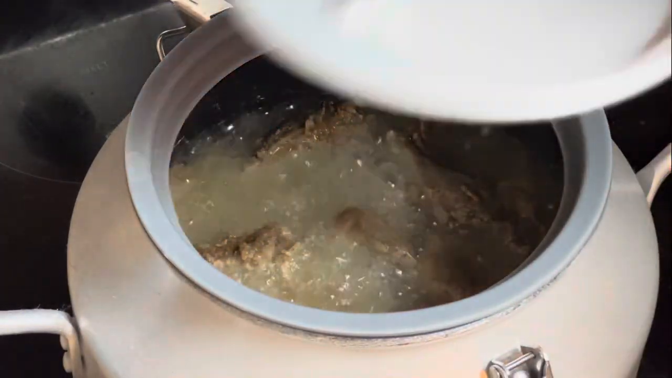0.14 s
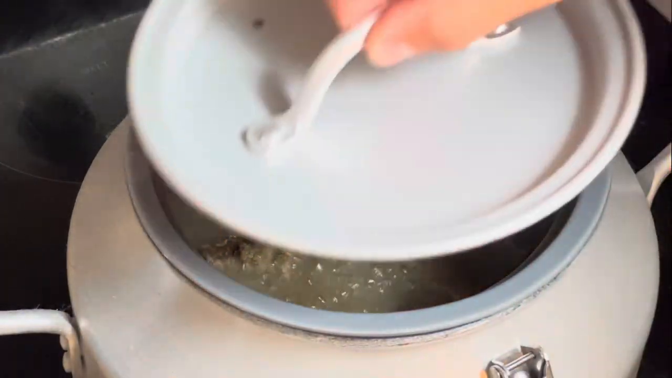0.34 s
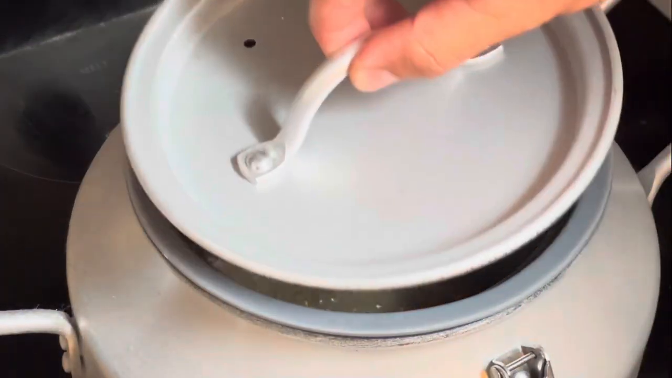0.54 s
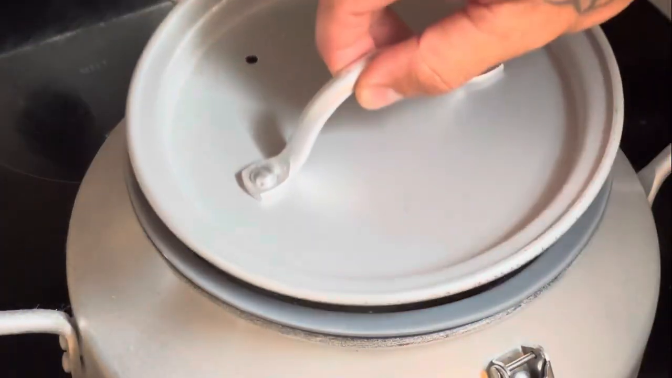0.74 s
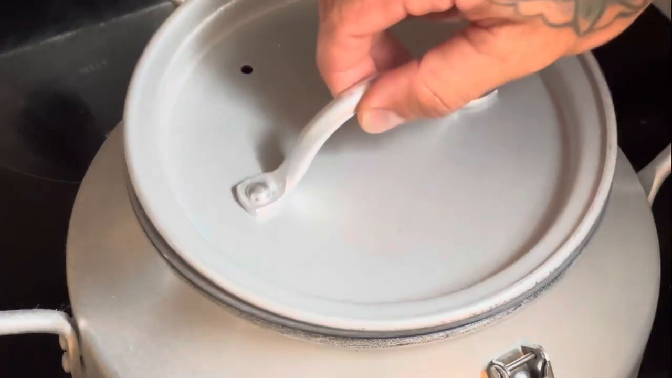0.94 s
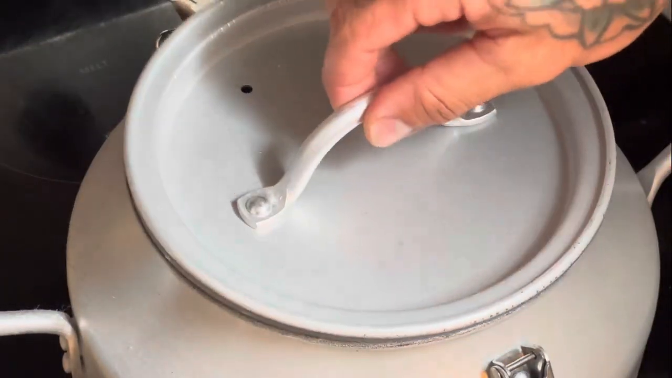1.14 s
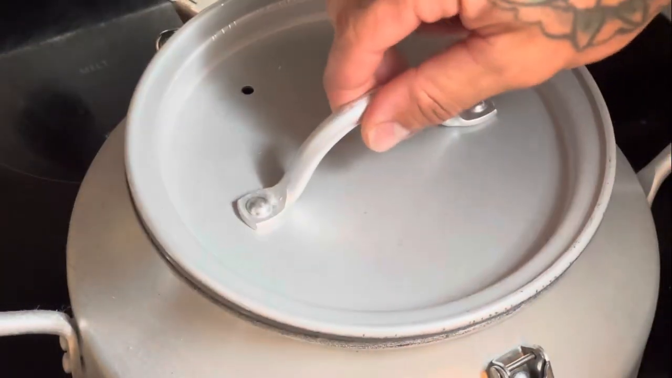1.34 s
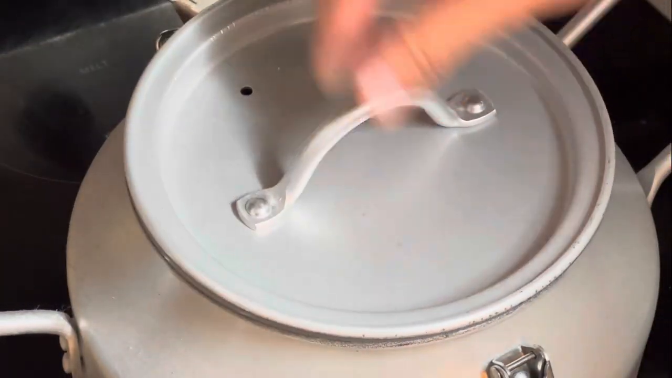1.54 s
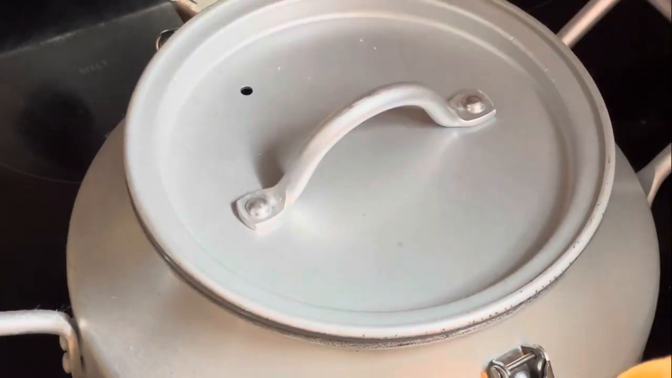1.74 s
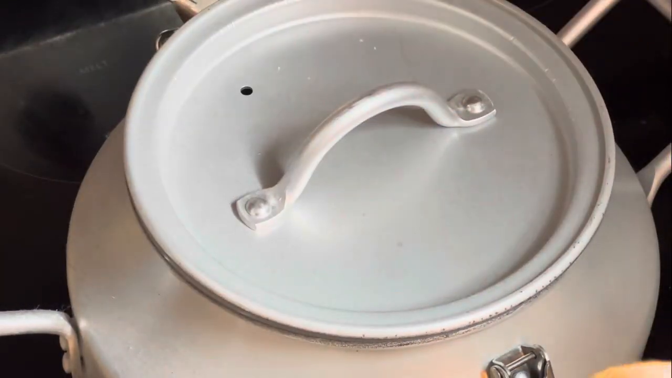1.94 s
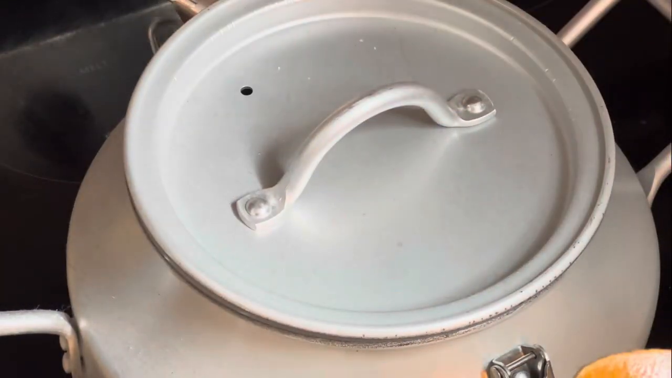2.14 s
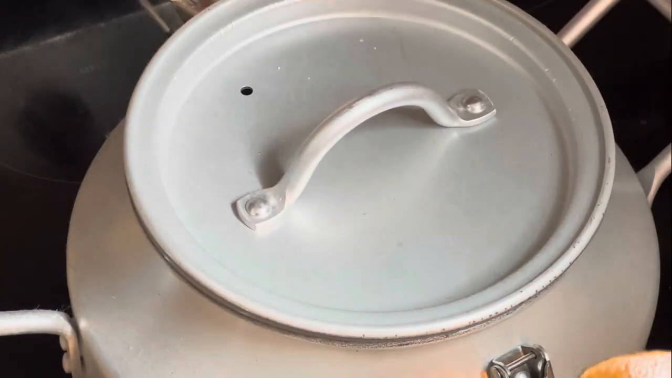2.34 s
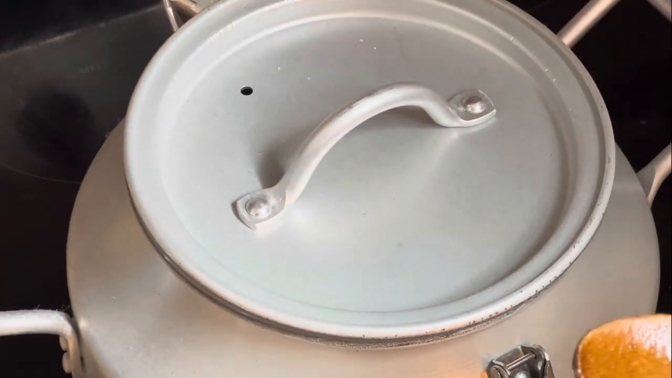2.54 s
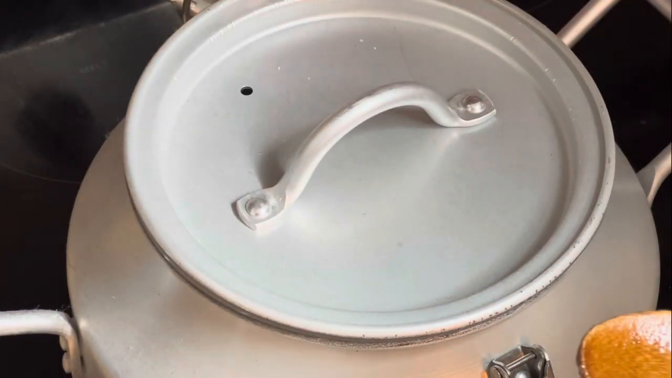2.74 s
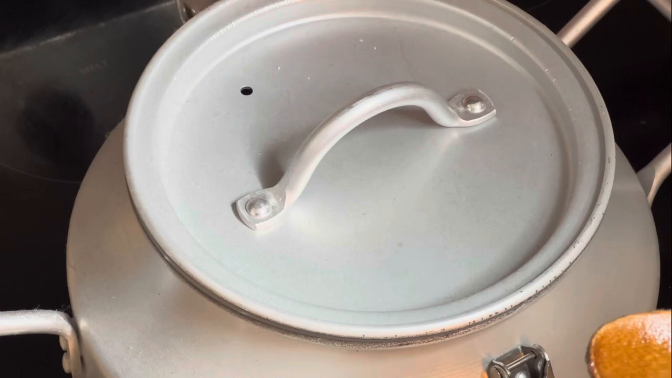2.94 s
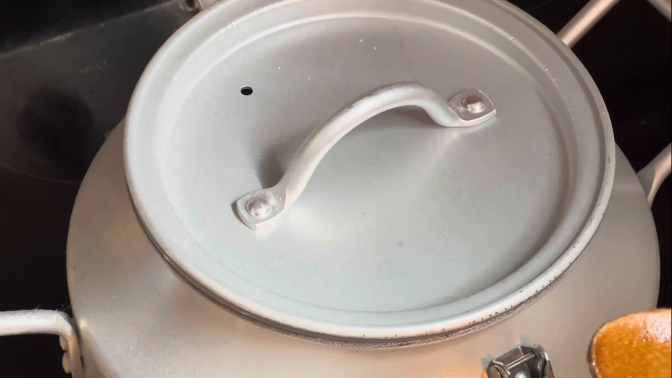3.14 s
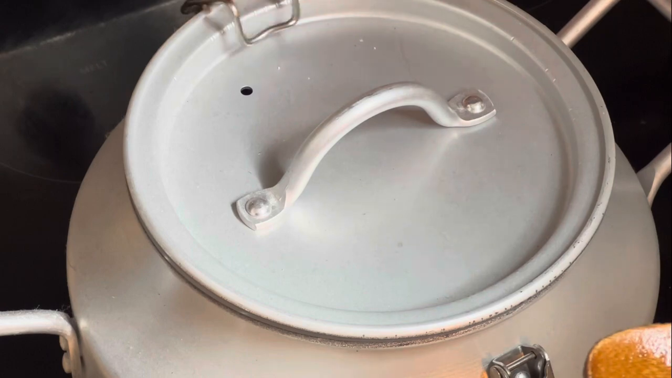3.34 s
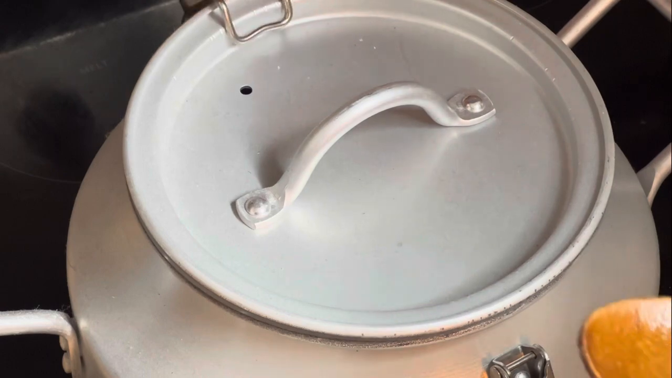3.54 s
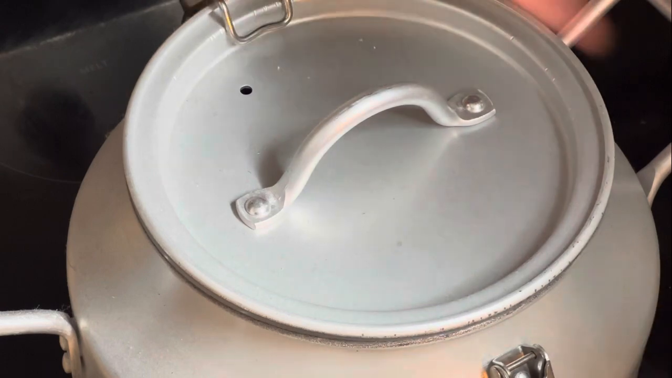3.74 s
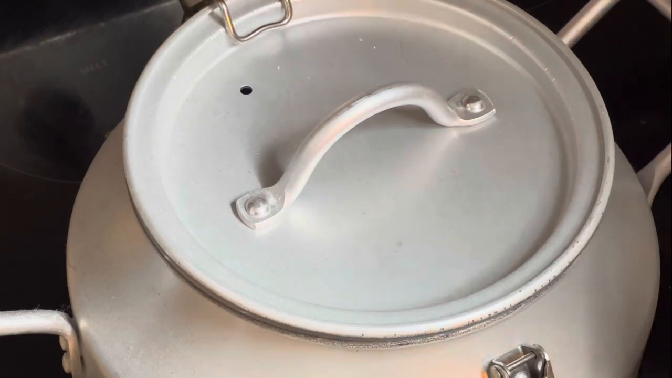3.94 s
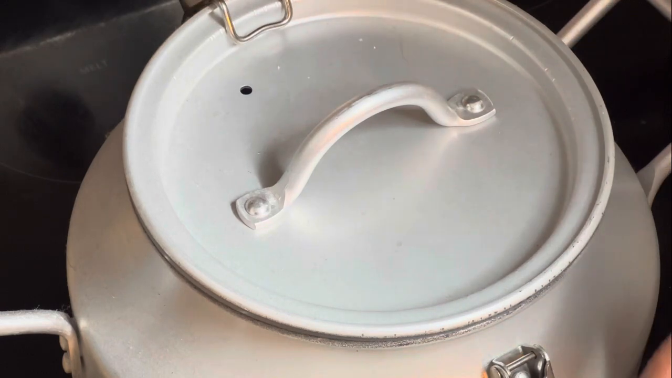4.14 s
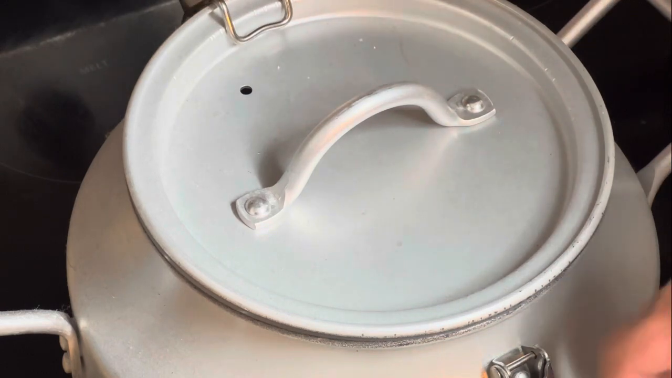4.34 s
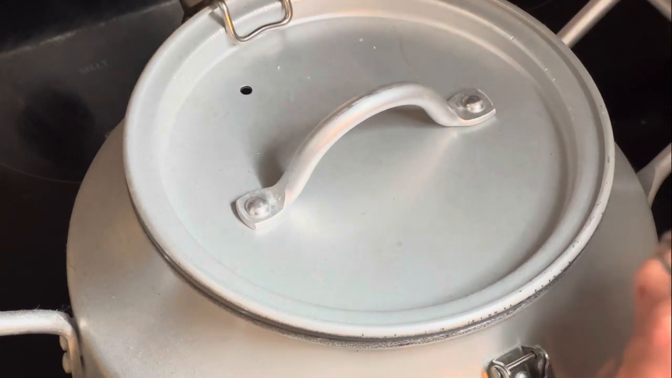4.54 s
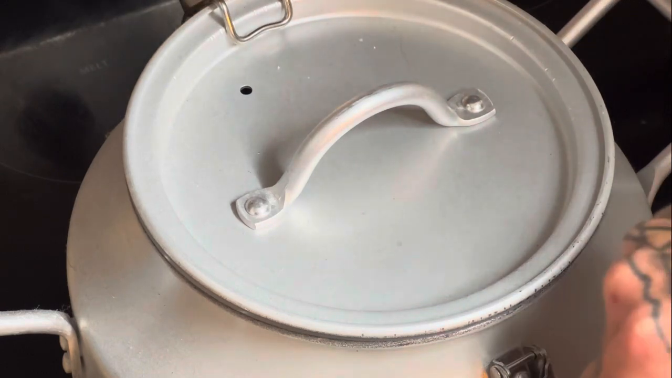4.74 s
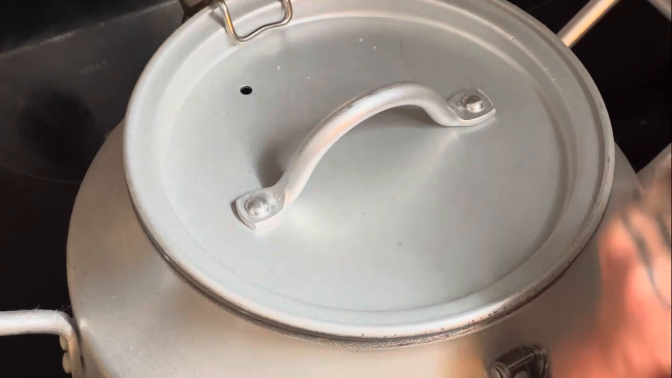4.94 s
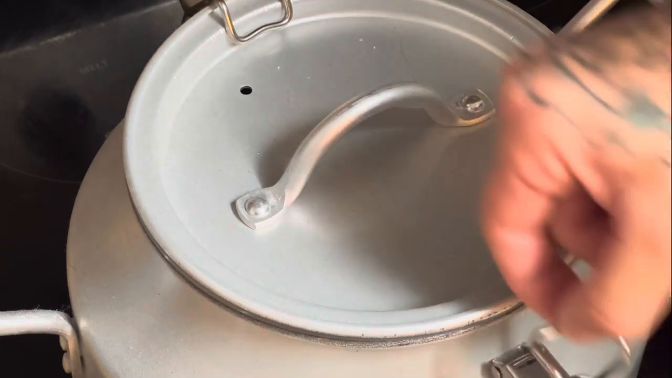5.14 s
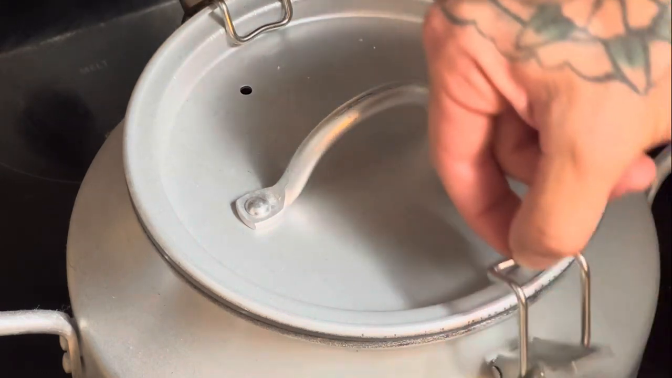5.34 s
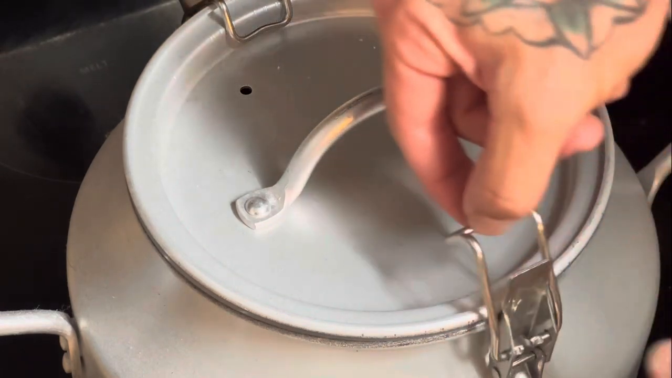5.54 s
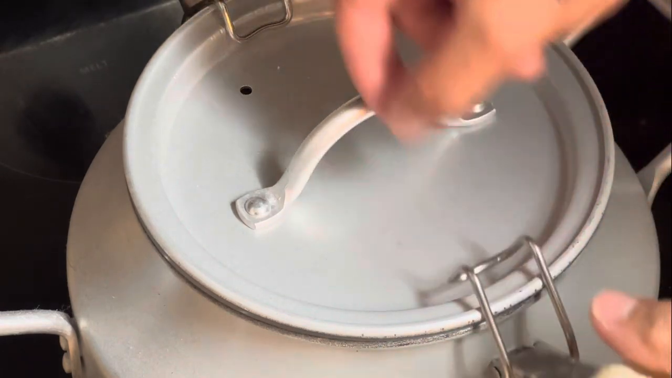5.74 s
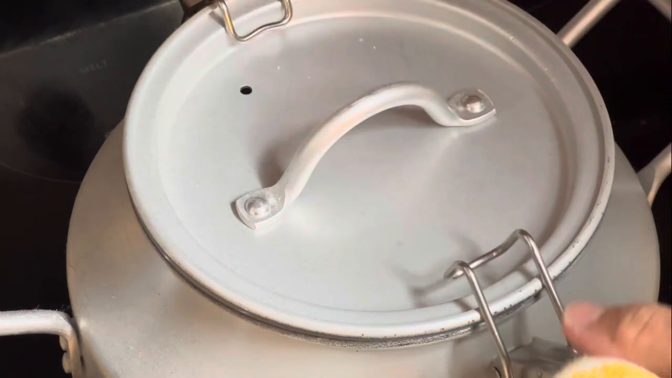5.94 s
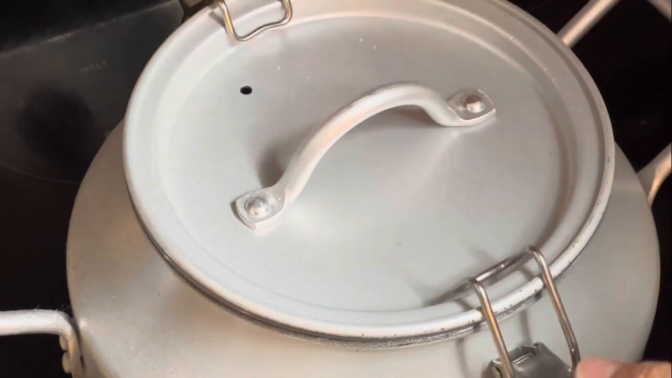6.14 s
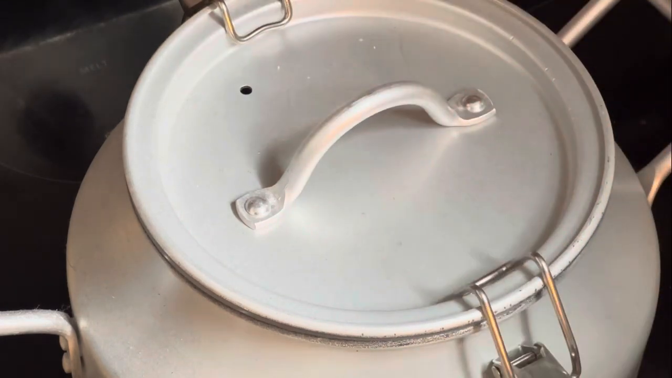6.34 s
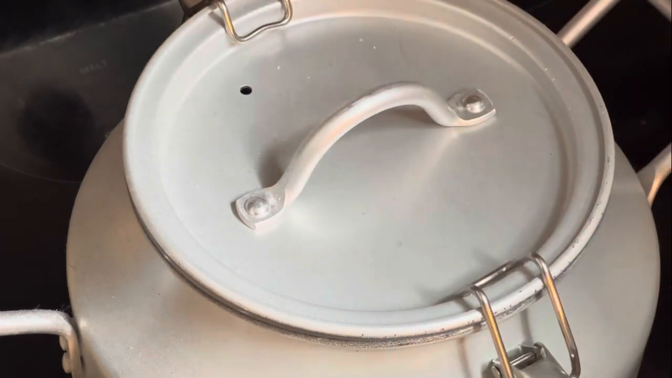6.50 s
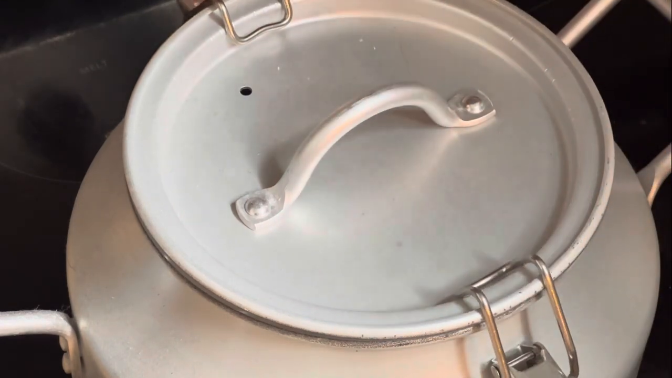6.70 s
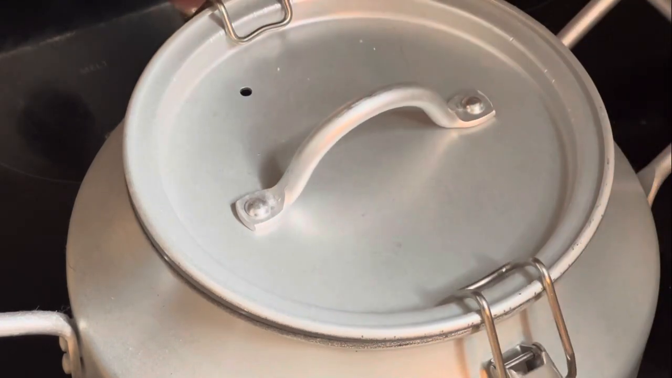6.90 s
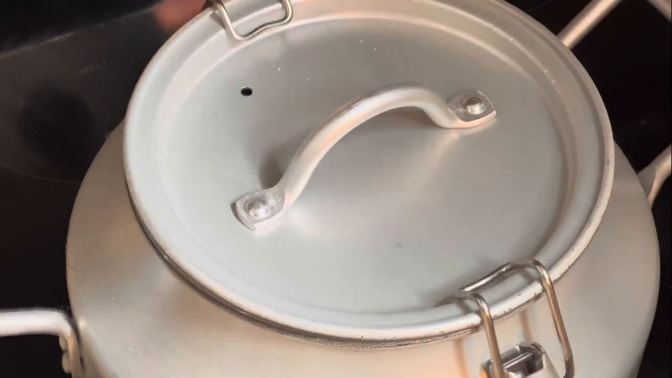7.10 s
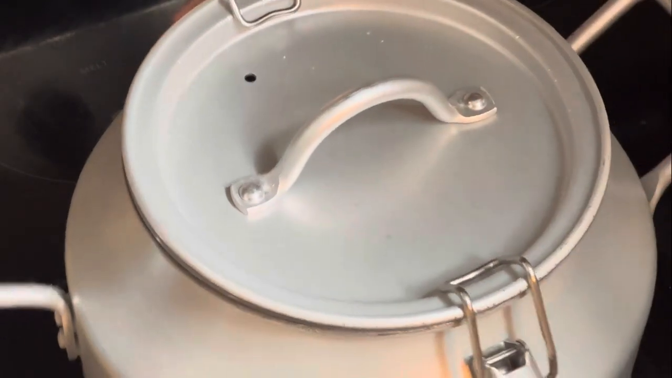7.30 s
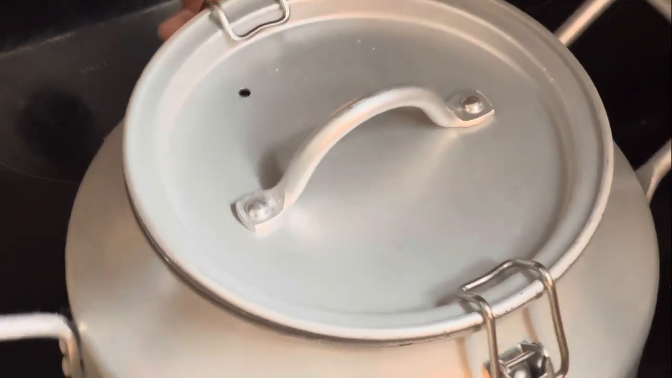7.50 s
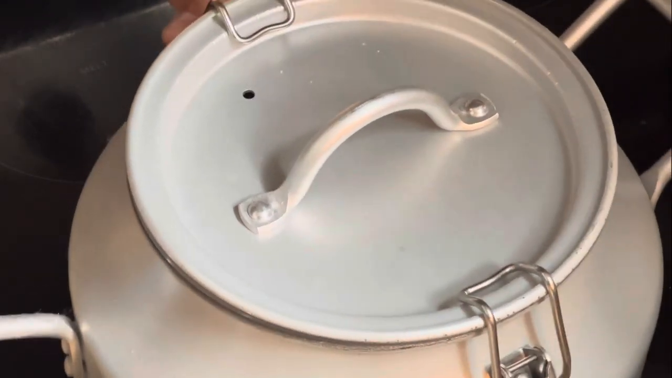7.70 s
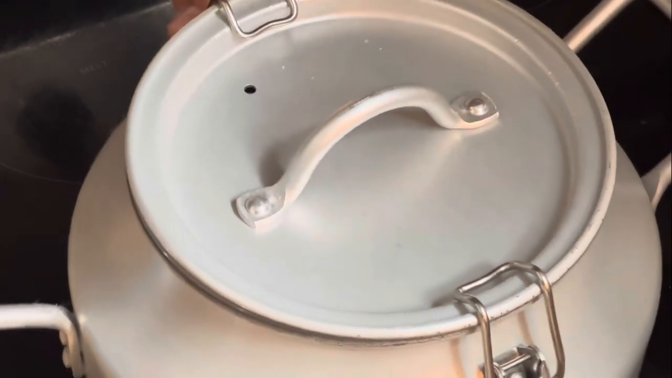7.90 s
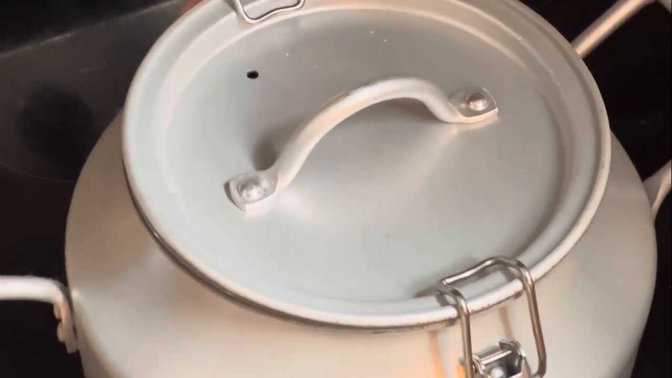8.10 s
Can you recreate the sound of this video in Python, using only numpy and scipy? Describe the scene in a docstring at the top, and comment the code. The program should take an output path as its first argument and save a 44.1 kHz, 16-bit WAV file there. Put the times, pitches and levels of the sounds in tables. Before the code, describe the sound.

Steady crackling fry from a pot, its hollow tone sinking as the lid closes, followed by sharp metallic clacks of wire clasps and latches.

```python
"""Frying meat sizzles in a deep metal pot: tiny bursts and hiss ring in many narrow pitch ranges.
A lid is lowered and muffles it, and the hollow tone of the pot's air sinks and fades.
Louder spits pop. Wire clasps flipped onto the lid and a snapping lever rattle, ring and thud.
A low rumble, a faint hum and a wandering drone lie underneath.
Two microphone ports close together hear the treble out of phase."""
import sys
import numpy as np
from scipy import signal
from scipy.fft import rfft, irfft, next_fast_len
from scipy.io import wavfile

SR = 44100
rng = np.random.default_rng(int(sys.argv[2]) if len(sys.argv) > 2 else 0)


def invert_db(level):
    """Linear amplitude ratio for a level in decibels (20 dB per decade), elementwise."""
    return 10 ** (np.asarray(level, dtype=float) / 20)


def pcm_store(signal):
    """Save signal as 16-bit PCM."""
    levels = np.round(np.clip(np.atleast_2d(signal), -1, 1) * 32767)
    wavfile.write(sys.argv[1], SR, levels.astype(np.int16).T)


N = 359856   # length in samples


def rms_one(x):
    """Scale to rms 1."""
    return x / np.sqrt(np.mean(x ** 2) + 1e-20)


def in_time(rows):
    """Turn each column of a time table into one value a sample."""
    s, *columns = np.transpose(rows)
    return [np.interp(np.arange(N) / SR, s, column) for column in columns]


def at_hz(points, hz):
    """Read a spectrum between its points, along a log-frequency axis."""
    points = np.array(points, float)
    return np.interp(np.log(hz + 1), np.log(points[:, 0] + 1), points[:, 1])


def coloured(x, spectrum):
    """Filter a sound by a spectrum, then scale to rms 1."""
    size = next_fast_len(N)
    hz = np.arange(size // 2 + 1) * SR / size
    return rms_one(irfft(rfft(x, size) * invert_db(at_hz(spectrum, hz)), size)[:N])


def drift(rate_hz):
    """Slow random wandering of spread 1, made at every 40th sample and joined by lines."""
    r = np.exp(-80 * np.pi * rate_hz / SR)
    slow = signal.lfilter([1], [1, -2 * r, r * r], rng.standard_normal(N // 40 + 2002))[2000:]
    return np.interp(np.arange(N) / 40, np.arange(len(slow)), rms_one(slow))


def ring(clicks, hz, t60_s):
    """A resonance: each unit click sets off a sine of height 1 that falls 60 dB in t60_s."""
    r, w = invert_db(-60 / (t60_s * SR)), 2 * np.pi * hz / SR
    return signal.lfilter([0, np.sin(w)], [1, -2 * r * np.cos(w), r * r], clicks + 1e-18)


def add(out, s, sound):
    """Mix a short sound in at a time in seconds."""
    i = round(s * SR)
    out[i:i + len(sound)] += sound[:len(out) - i]


def opening():
    """Share of the pot mouth left free: the lid covers it slowly at first, then faster."""
    lid_down_s, closing_bend = 1.15, 1.4
    return 1 - np.minimum(np.arange(N) / SR / lid_down_s, 1) ** closing_bend


def vigour_db():
    """How far the frying stands above its settled level: a short flare dies, then it settles."""
    flare_db, flare_s, settle_db, settle_s = 3.5, 0.064, 1.5, 1
    t = np.arange(N) / SR
    return flare_db * np.exp(-t / flare_s) + settle_db * np.exp(-t / settle_s)


def sizzle():
    """Tiny steam bursts and hiss ring in narrow pitch ranges; each swells and thins by itself."""
    # colour of the frying: pitch_hz [Hz], density_db [dB per Hz]
    sizzle_colour = [(200, -4), (600, -11.5), (1500, -5), (2300, -2.5), (3000, 1.5), (3900, 2), (4700, 0.5),
                     (6300, 3), (8200, 5), (10100, 1), (11000, -6.5), (13000, -9), (15700, -3),
                     (16300, -26)]
    shut_lid_db, open_mouth_extra_db = -50.5, 3
    sizes = invert_db(3.0 * np.minimum(rng.exponential(1, N), 4)) * rng.choice([-1, 1], N)
    born = rng.random(N) < 6000 * invert_db(3.0 * drift(40)) / SR   # bursts crowd and thin out
    pitches = np.geomspace(600, 16000, 18)
    dealt = rng.integers(0, 18, N)   # the pitch range each burst falls in
    hiss = invert_db(-18.5) * rng.standard_normal((2, N))
    out = 0
    for k, hz in enumerate(pitches):
        bursts = ring(sizes * born * (dealt == k) + hiss[k % 2], hz, 5.0 / hz)
        out = out + rms_one(bursts) * np.sqrt(hz) * invert_db(2.4 * drift(12))
    level_db = shut_lid_db + open_mouth_extra_db * opening() + vigour_db() + .5 * drift(10)
    return coloured(out, sizzle_colour) * invert_db(level_db)


def pot_air():
    """Bubbling excites the air in the pot; the narrowing mouth lowers one pitch, not the other."""
    open_mouth_hz, mouth_db = 485, -60
    crosswise_hz, crosswise_db = 1035, -4   # air swinging from side to side; level against the mouth tone
    t = np.arange(N) / SR
    hz = open_mouth_hz * np.sqrt(opening())
    # fades by 40 dB as the gap shuts
    level_db = mouth_db + vigour_db() + np.interp(t, (.95, 1.15), [0, -40])
    slow = signal.sosfilt(signal.butter(2, 40, fs=SR, output="sos"), rng.standard_normal((4, N)))
    mouth_turn = 2 * np.pi * np.cumsum(hz) / SR
    cross_turn = 2 * np.pi * crosswise_hz * t
    # slow noise times a tone gives a noise band around that pitch
    mouth = rms_one(slow[0] * np.cos(mouth_turn) + slow[1] * np.sin(mouth_turn))
    across = rms_one(slow[2] * np.cos(cross_turn) + slow[3] * np.sin(cross_turn))
    return invert_db(level_db) * (mouth + invert_db(crosswise_db) * across)


def spits():
    """Each louder spit of fat is a sharp pop around its pitch with a short fizz."""
    # spits of fat: start_s [s], level_db [dB], pitch_hz [Hz]
    spit_rows = [(1.47, -47, 2250), (1.4887, -45, 5880), (1.8695, -32, 5500), (2.208, -37, 4150),
                 (4.191, -46, 3010), (4.6896, -38.5, 2590), (4.782, -39, 5190), (5.1474, -38, 6000),
                 (5.41, -36.5, 5860), (5.829, -43, 5900), (6.685, -38, 3240), (6.7238, -36, 4270),
                 (6.8042, -41, 3850)]
    out, t = np.zeros(N), np.arange(2000) / SR
    noise = rng.standard_normal((len(spit_rows), len(t)))
    for (s, db, hz), puff in zip(spit_rows, noise):
        pop = ring((t == 0) * 1., hz, 6.0 / hz)
        fizz = rms_one(ring(puff, hz, 5.0 / hz)) * invert_db(-60 * t / .025)
        add(out, s, invert_db(db) * (pop + 0.41 * fizz))
    return out


def tinted(noise):
    """Noise plus what it rings in a crowd of short metal modes, equally loud."""
    crowd = sum(ring(noise, hz, .045) for hz in rng.uniform(600, 16000, 100))
    return rms_one(noise) + rms_one(crowd)


def struck(blows, modes, pot_modes, colour, t60_s, treble_speed, thud_roughness):
    """Metal on metal rattles, the struck part rings, the pot thuds; rings stay apart from noises."""
    crack_db, crack_t60_s = -2.5, 0.014   # a short crack opens every rattle
    ring_chatter = .25
    noises, rings = np.zeros((2, N))
    t = np.arange(SR // 2) / SR
    uneven = rng.standard_normal(N) * invert_db(2.2 * drift(120))   # uneven contacts
    rattle = coloured(tinted(uneven), colour)
    dull = signal.sosfilt(signal.butter(2, 11000, fs=SR, output="sos"), rattle)
    bright = rattle - dull
    spread_db = rng.normal(0, 1.8, (len(blows), len(modes) + len(pot_modes)))   # no two blows are alike
    loose = drift(90)   # the loose wire touches and frees the ringing metal
    click = (t == 0) * 1.
    rise, thud_rise = 1 - np.exp(-t / 0.002), 1 - np.exp(-t / 0.004)
    fall_db = -60 * t / t60_s
    crack = invert_db(crack_db - 60 * t / crack_t60_s)
    low_fall = invert_db(fall_db) + crack
    high_fall = invert_db(treble_speed * fall_db) + crack
    for (s, rattle_db, ring_db, thud_db, spot), chance_db in zip(blows, spread_db):
        i = round(s * SR)
        span = slice(i, i + len(t))
        add(noises, s, invert_db(rattle_db) * rise * (dull[span] * low_fall + bright[span] * high_fall))
        tones = 0
        for (hz, *spot_db, mode_t60_s), chance in zip(modes, chance_db):
            db = spot_db[min(round(spot), len(spot_db) - 1)]
            tones = tones + invert_db(db + chance) * ring(click, hz, mode_t60_s)
        add(rings, s, invert_db(ring_db) * rise * tones * (1 + ring_chatter * loose[span]))
        thud = 0
        for (hz, db, mode_t60_s), chance in zip(pot_modes, chance_db[::-1]):
            thud = thud + invert_db(db + chance) * ring(click, hz, mode_t60_s)
        add(noises, s, invert_db(thud_db) * thud_rise * thud * (1 + thud_roughness * loose[span]))
    return np.array([noises, rings])


def lid():
    """Contacts on the lid make it rattle and ring at its own modes, and the pot thuds."""
    # contacts: start_s [s], rattle_db [dB], ring_db [dB], thud_db [dB], spot [0-2]
    lid_blows = [(1.128, -42, -54.5, -34, 1), (2.663, -14, -29.5, -31, 0), (2.694, -25, -47, -38.5, 0),
                 (3.3265, -7.5, -18.5, -28, 0), (3.496, -16, -54, -49, 1), (3.4995, -16, -28, -23.5, 1),
                 (5.489, -14.5, -30, -49, 2), (5.593, -15, -26, -33, 2), (5.611, -26, -40, -53, 2),
                 (5.718, -29, -43.5, -56, 2), (6.277, -57, -43, -48, 2), (6.287, -36, -72, -44, 2)]
    # ringing of the lid: pitch_hz [Hz], level_db when struck at spot 0, 1, 2 [dB], t60_s [s]
    lid_modes = [(1085, -8, -8, -5, .05), (1265, -9, -10, -10, .05), (1136, -11, -8, -5, .16),
                 (1195, 0, -4, -6, .24), (2024, -24, -4, -26, .2), (2094, -8, -18, -24, .2),
                 (2775, -22, -10, -22, .18), (3020, -22, -9, -9, .16), (3192, -8, -11, -18, .2),
                 (3440, -24, -20, -9, .1), (3596, -26, -4, -24, .26), (4770, -12, -16, -14, .14),
                 (4960, -18, -16, -6, .12), (5200, -12, -14, -12, .1), (5604, -15, -16, -10, .16),
                 (5792, -15, -16, -12, .14), (6280, -10, -7, -3, .12), (6950, -11, -9, -8, .13),
                 (7693, -18, -18, -18, .13), (8300, -8, -18, -18, .07), (8890, -5, -11, -6, .12),
                 (9235, -3, -6, -4, .14), (9685, -7, -12, -10, .13), (10890, -14, -18, -14, .1)]
    # modes of the pot wall: pitch_hz [Hz], level_db [dB], t60_s [s]
    pot_top = [(87, -8.5, 0.12), (163.4, -1, 0.11), (200.4, -10.5, 0.19), (482, -4, 0.033),
               (677, -11.5, 0.037)]
    # colour of the rattle: pitch_hz [Hz], density_db [dB per Hz]
    lid_rattle = [(150, -27), (500, -15), (1700, -18), (3000, -15.5), (4300, -10), (5200, -10), (6400, -5),
                  (7300, -8), (8000, -7), (8700, 3), (9200, -2), (10300, -13), (11500, -17.5), (16000, -10)]
    return struck(lid_blows, lid_modes, pot_top, lid_rattle,
                  t60_s=0.074, treble_speed=1.08, thud_roughness=0.6)


def lever():
    """The clasp lever snaps: it rattles and rings at its own modes, and the pot thuds."""
    # snaps: start_s [s], rattle_db [dB], ring_db [dB], thud_db [dB], spot [0-1]
    lever_snaps = [(7.130, -7.5, -23.5, -28, 0), (7.490, -22, -20, -26.5, 1)]
    # ringing of the lever: pitch_hz [Hz], level_db when struck at spot 0, 1 [dB], t60_s [s]
    lever_modes = [(1017, -8, -20, .15), (2660, -10, -22, .15), (2990, -8, -17, .18), (3854, -3, -20, .17),
                   (4200, -4, -20, .1), (4950, -8, 1, .05), (5230, -2, -8, .06), (6185, -10, -17, .1),
                   (6944, -12, -16, .1), (8737, -3, -3, .05), (9356, -10, -12, .08), (9841, -8, -16, .1)]
    # modes of the pot wall: pitch_hz [Hz], level_db [dB], t60_s [s]
    pot_side = [(304, 1, 0.059), (364, 2.5, 0.081), (485, -16, 0.045), (667, -9, 0.12)]
    # colour of the rattle: pitch_hz [Hz], density_db [dB per Hz]
    lever_rattle = [(70, -34), (200, -15), (400, -5), (1000, -7), (2700, -9.5), (4700, -5.5), (6200, -7),
                    (7400, -7), (8400, -3), (9300, -2), (10500, -10), (16000, -11)]
    return struck(lever_snaps, lever_modes, pot_side, lever_rattle,
                  t60_s=0.056, treble_speed=0.96, thud_roughness=1.0)


def knocks():
    """Lid and hands knock on the pot: a fading tone and noise through a broad resonance."""
    # knocks: start_s [s], level_db [dB], centre pitch_hz [Hz]
    knock_rows = [(.933, -41, 207), (0.936, -54.5, 1260), (1.108, -34.5, 177), (1.129, -40.5, 3835),
                  (1.133, -39.5, 5920), (1.171, -46, 113), (2.107, -50.5, 1380), (2.68, -57, 60),
                  (3.512, -37.5, 58.7), (4.15, -55.5, 1076), (5.619, -53, 60), (6.266, -51.5, 461),
                  (6.701, -42, 504), (6.704, -51, 975), (7.148, -33, 54.3)]
    cycles = 3.5   # ringing time of the resonance in cycles: fewer is broader
    out, t = np.zeros(N), np.arange(SR // 2) / SR
    noise = rng.standard_normal((len(knock_rows), len(t)))
    for (s, db, hz), puff in zip(knock_rows, noise):
        fall = invert_db(-60 * t / (0.18 * (100 / hz) ** 0.22))   # higher knocks die sooner
        twice_rung = ring(ring(puff, hz, cycles / hz), hz, cycles / hz)
        body = rms_one(twice_rung) * (1 - np.exp(-t * hz))
        push = 1.93 * np.sin(2 * np.pi * hz * t) * fall
        add(out, s, invert_db(db) * (body + push) * fall)
    return out


def room(x):
    """A diffuse tail that sets in after a few milliseconds, duller than the direct sound."""
    t60_s = 0.42
    t = np.arange(SR // 2) / SR
    tail = rng.standard_normal(len(t)) * invert_db(-60 * t / t60_s) * (1 - np.exp(-t / .01))
    tail = signal.sosfilt(signal.butter(1, 15000, fs=SR, output="sos"), tail)
    return signal.fftconvolve(x, tail / np.sqrt(np.sum(tail ** 2)))[:N]


def rumble():
    """Coloured noise whose level wanders: a lumpy low rumble."""
    # level of the rumble: start_s [s], level_db [dB]
    rumble_level = [(0.0, -64), (1.0, -62.5), (2.2, -66), (3.0, -58), (4.2, -60), (5.0, -61.5), (6.4, -62),
                    (7.3, -56), (8.16, -61.5)]
    # colour of the rumble: pitch_hz [Hz], density_db [dB per Hz]
    rumble_colour = [(12, -45), (20, -29), (43, 0), (91, 3.5), (106, -18.5), (125, -7.5), (268, -13),
                     (300, -13.5), (330, -18), (447, -15.5), (900, -30.5), (1980, -46)]
    level_db = in_time(rumble_level)[0] + 1.5 * drift(5) + 1.5 * drift(1.5)
    return coloured(rng.standard_normal(N), rumble_colour) * invert_db(level_db)


def unsteady_tone(hz, level_db):
    """A sine whose pitch and level waver a little."""
    turn = 2 * np.pi * np.cumsum(hz + 1.2 * drift(4)) / SR
    return np.sqrt(2) * invert_db(level_db + 1.5 * drift(6)) * np.sin(turn)


def hum():
    """A slightly wavering tone around one pitch that swells by 20 dB and stays."""
    level_db = -70 + np.interp(np.arange(N) / SR, (3.8, 4.8), [-20, 0])
    return unsteady_tone(274, level_db)


def drone():
    """A low tone that wanders in pitch for about two seconds."""
    # path of the drone: start_s [s], pitch_hz [Hz], level_db [dB]
    drone_path = [(2.8, 105, -91), (2.95, 111.8, -60), (3.3, 116.5, -64.5), (3.5, 125, -81),
                  (3.8, 128.5, -77), (4.05, 134.3, -64), (4.25, 114.3, -64.5), (4.4, 99.4, -64),
                  (4.901, 97.3, -65), (5.1, 99, -85)]
    hz, level_db = in_time(drone_path)
    return unsteady_tone(hz, level_db)


def scene():
    """All sources meet at one spot; only the metal and the knocks lose deep bass and stir the room."""
    metal = lid() + lever()
    no_deep_bass = signal.butter(2, 40, "high", fs=SR, output="sos")
    noises, rings = signal.sosfilt(no_deep_bass, metal + knocks() * [[1], [0]])
    # the thin rings carry less into the room than the crashes
    walls = invert_db(-12) * room(noises + .35 * rings)
    here = sizzle() + pot_air() + spits() + noises + rings + walls + rumble() + hum() + drone()
    return np.array([here, here])


def band_limit(x):
    """A steep low-pass at the top of the band."""
    return signal.sosfilt(signal.butter(12, 16800, fs=SR, output="sos"), x)


def record(dry):
    """The ports turn the treble's phase apart; scattered sound is added left, taken away right."""
    # phase between the ports: pitch_hz [Hz], lead of the left [radians]
    port_phase = [(6720, 0), (7320, 1.2), (7700, 3.1), (8750, 3.15), (9300, 1.4), (10200, .75), (10550, 0),
                  (13100, 0), (14500, -1.5), (15600, -2.0), (16000, -2.9)]
    # sound that differs left and right: pitch_hz [Hz], level_db against the middle [dB]
    scatter_level = [(40, -26), (100, -19), (200, -15), (450, -9), (740, -6), (1200, -11), (1700, -30),
                     (3300, -22), (5000, -32), (16000, -30)]
    # the sound stops just above 16 kHz: pitch_hz [Hz], level_db [dB]
    top_cut = [(15800, 0), (16100, -24), (16800, -41)]
    size = next_fast_len(N + SR // 4)
    hz = np.arange(size // 2 + 1) * SR / size
    t = np.arange(SR // 8) / SR
    echoes = rng.standard_normal(len(t)) * invert_db(-60 * t / .12)
    scatter = rfft(echoes / np.sqrt(np.sum(echoes ** 2)), size) * invert_db(at_hz(scatter_level, hz))
    half_turn = np.exp(.5j * at_hz(port_phase, hz))   # each port takes half the phase difference
    ports = np.array([half_turn + scatter, np.conj(half_turn) - scatter]) * invert_db(at_hz(top_cut, hz))
    mix = irfft(rfft(dry, size) * ports, size)[:, :N]
    return band_limit(mix)


dry = scene()
out = record(dry)
pcm_store(out)
```